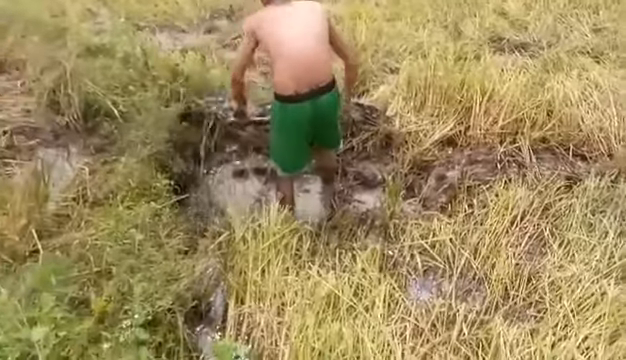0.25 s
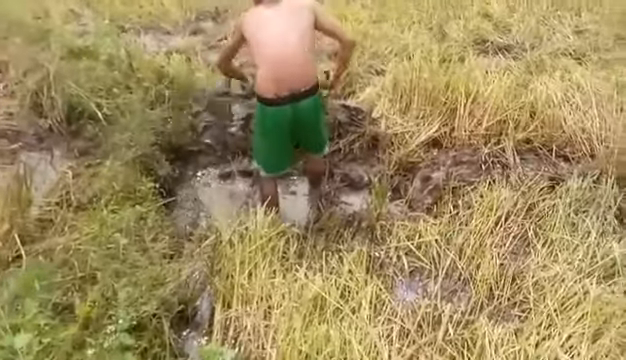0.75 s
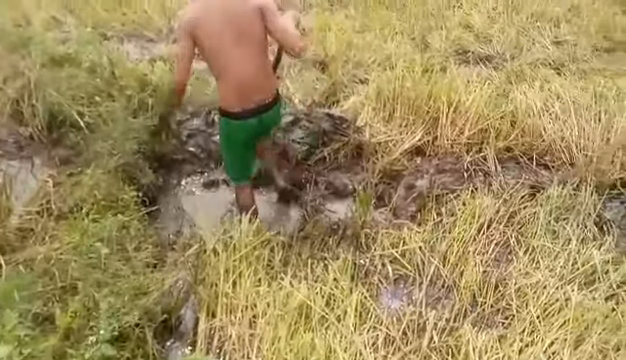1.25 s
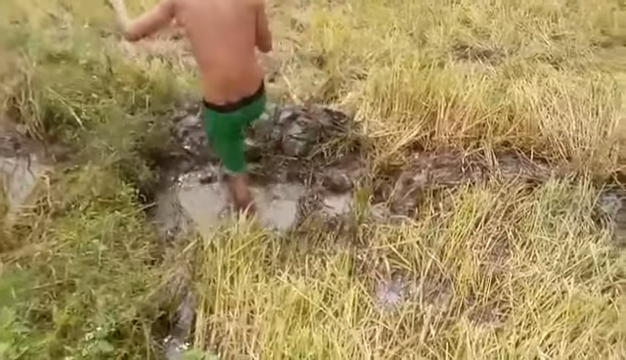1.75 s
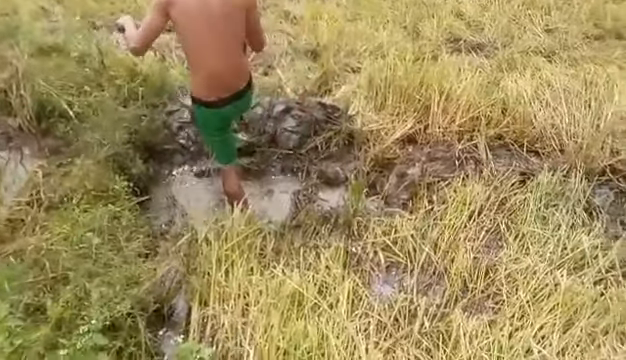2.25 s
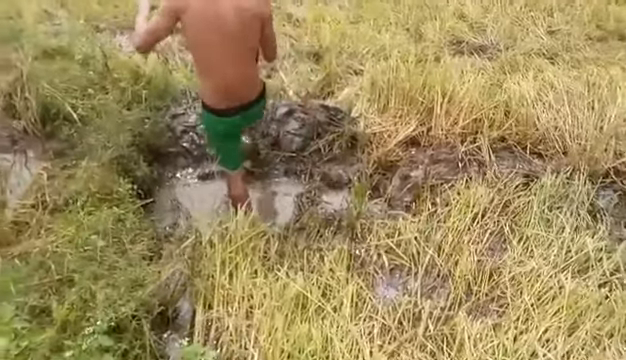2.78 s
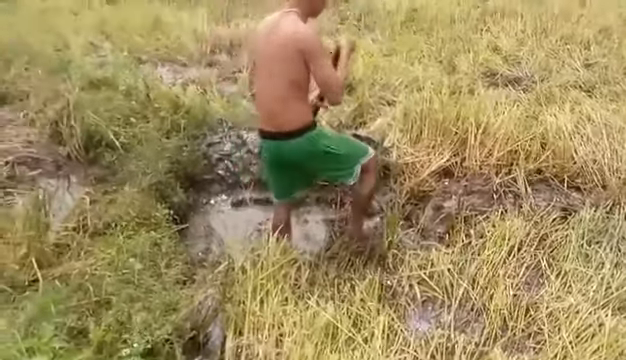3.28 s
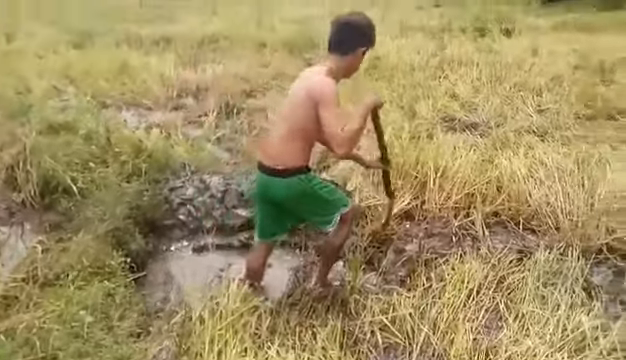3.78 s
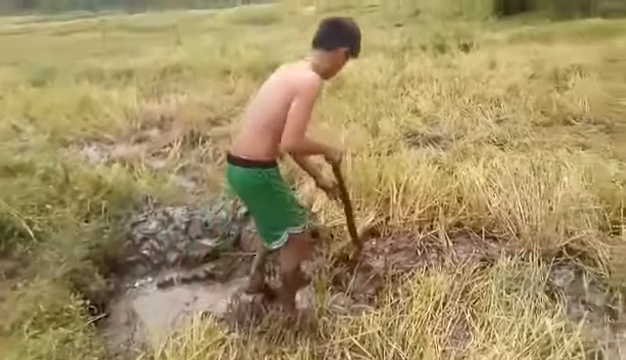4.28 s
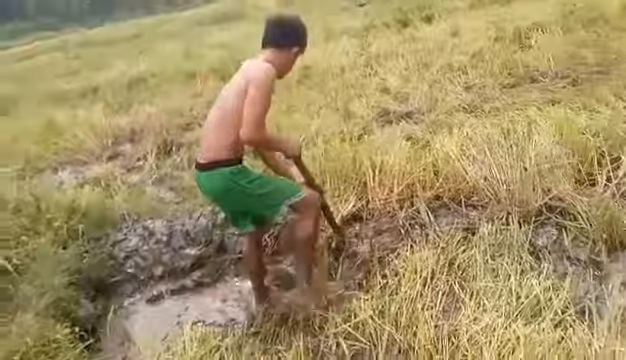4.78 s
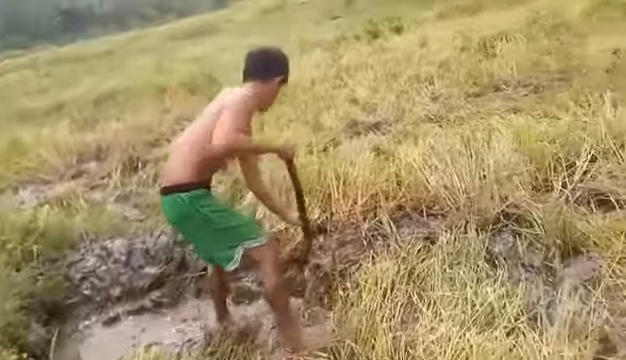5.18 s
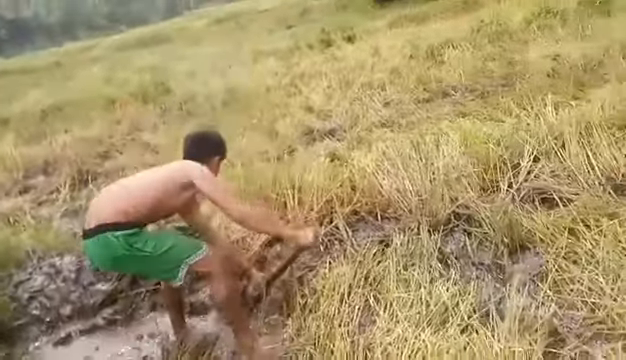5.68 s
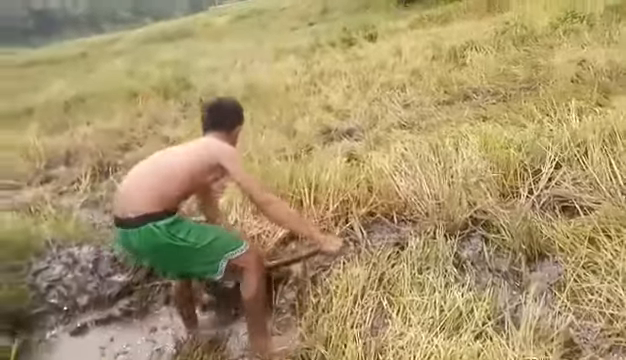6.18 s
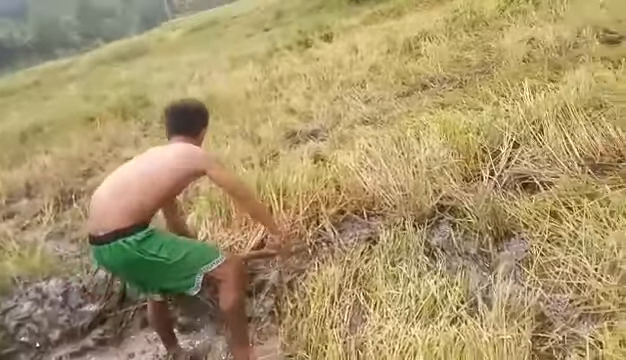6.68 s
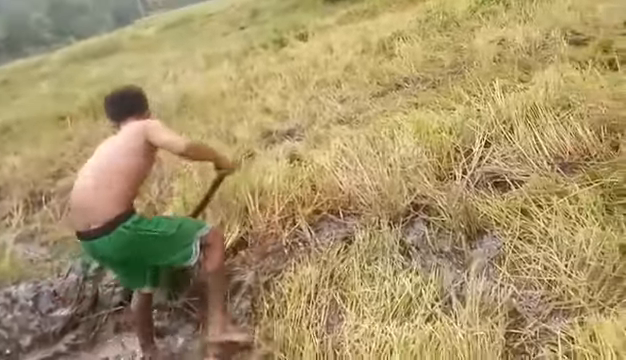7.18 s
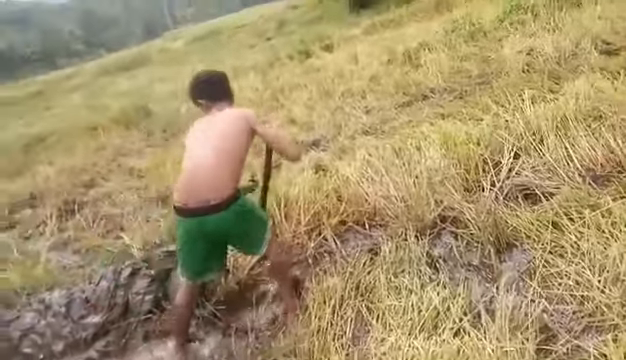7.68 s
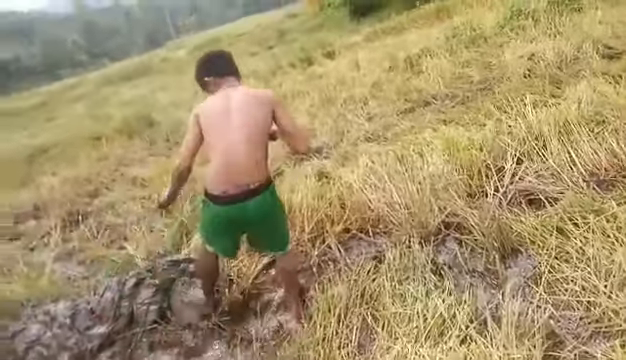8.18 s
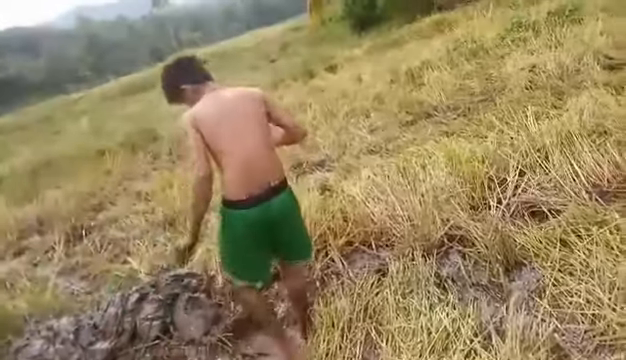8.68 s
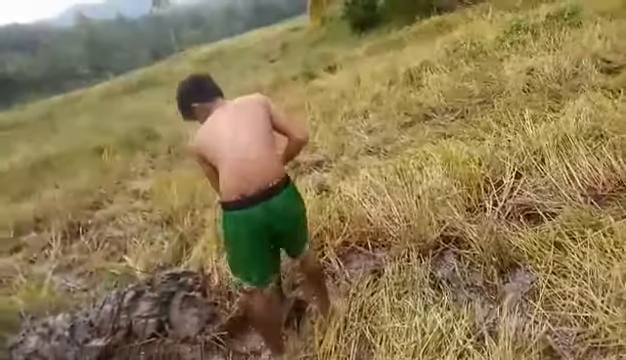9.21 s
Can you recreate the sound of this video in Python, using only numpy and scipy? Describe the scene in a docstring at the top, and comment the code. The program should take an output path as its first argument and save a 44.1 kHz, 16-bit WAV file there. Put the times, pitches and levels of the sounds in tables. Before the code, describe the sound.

Close wet plops, mud gulps and sloshing steps in a boggy field, faint far bird calls early on and light breeze on the microphone.

```python
"""Feet and a stick splash and squelch close by in shallow muddy water in an open field: bursts of small bubbles
over rushing noise. Single bubbles plop with a crack and a ring; mud gulps low, the deepest like thuds.
Far birds whistle, coo and twitter as gliding tones, blurred by a decaying echo; a far engine is one soft low tone.
The hush of grass and insects is patchy filtered noise, and a light breeze buffets the microphone in low gusts."""
import sys
import numpy as np
from scipy import signal
from scipy.fft import rfft, irfft, next_fast_len
from scipy.io import wavfile
from scipy.ndimage import uniform_filter1d, map_coordinates

SR = 44100
rng = np.random.default_rng(int(sys.argv[2]) if len(sys.argv) > 2 else 0)


def materialize(psi):
    """Save the field psi as 16-bit PCM at rate SR to the path in sys.argv[1].

    A 1-D psi becomes a single channel; in a 2-D psi each row is a channel.
    """
    bounded = np.clip(np.atleast_2d(psi).T, -1, 1)
    quanta = np.round(bounded * 32767).astype(np.int16)
    wavfile.write(sys.argv[1], SR, quanta)


N = 416744  # length in samples


def amp(db):
    """Gain of a level in dB."""
    return 10 ** (np.asarray(db) / 20)


def unit(x):
    """x at rms 1."""
    return x / np.sqrt(np.mean(x ** 2) + 1e-20)


def wobble(rate):
    """A smooth random curve, rate knots a second."""
    knots = rng.standard_normal(int(N * rate / SR) + 4)
    return map_coordinates(knots, [np.arange(N) * rate / SR])


def filter_length():
    """A fast transform length with room for the filter's tail."""
    return next_fast_len(N + 8192)


def coloured(x, spectrum):
    """x filtered by gain points (Hz, dB), joined on a log frequency axis."""
    m = filter_length()
    hz, db = np.transpose(spectrum)
    bins = np.fft.rfftfreq(m, 1 / SR)
    gain = amp(np.interp(np.log(bins + 1), np.log(hz + 1), db))
    return irfft(rfft(x, m) * gain, m)[:N]


def swells(starts, lengths, levels_db, rise, fall):
    """Bursts, summed in power, that rise over a share of their length, hold and die away in fall seconds."""
    power = np.zeros(N + 2 * SR)
    for start, length, db in zip(starts, lengths, levels_db):
        t = np.arange(round((length + 5 * fall) * SR)) / SR
        onset = 1 - np.exp(-(t / (rise * length)) ** 2)
        decay = np.exp(-np.maximum(t - length + fall / 2, 0) / fall)
        power[round(start * SR):][:len(t)] += (amp(db) * onset * decay) ** 2
    return np.sqrt(power[:N])


def patchy(depth_db):
    """Noise whose gain varies in patches of time and frequency."""
    z = signal.stft(rng.standard_normal(N), nperseg=512)[2]
    patches = uniform_filter1d(rng.standard_normal(z.shape), size=6, axis=0)
    patches = uniform_filter1d(patches, size=12, axis=1)
    return unit(signal.istft(z * amp(depth_db * unit(patches)), nperseg=512)[1][:N])


# Tone of the open field all round. Each row: frequency in Hz, relative level in dB.
HUSH_SPECTRUM = [(170, -17), (780, -19), (900, -3), (1150, 1.5), (1500, -8), (2000, -2.5), (3600, -7.5),
                 (4500, -17), (5600, -30), (8200, -43), (9600, -28), (13000, -97.5)]


def field_hush():
    """The hush of grass and insects: patchy noise with a broad middle and a small rise near 9.6 kHz."""
    hush_db = -48  # rms
    return amp(hush_db) * unit(coloured(patchy(depth_db=3.0), HUSH_SPECTRUM))


# Gusts of breeze right at the microphone. Each row: start in seconds, length in seconds, level in dB.
GUSTS = [(0.19, 0.613, -52.5), (0.987, 0.25, -57), (1.831, 0.3, -54.5), (2.913, 0.32, -55),
         (4.044, 0.31, -64.5), (4.458, 0.31, -59), (5.17, 0.38, -59.5), (5.713, 0.11, -49.5),
         (5.965, 0.56, -58.5), (6.801, 0.2, -55), (8.138, 0.35, -54.5)]
# Tone of the buffeting. Each row: frequency in Hz, relative level in dB.
BUFFET_SPECTRUM = [(20, -33), (64, -8), (128, 7), (221, -9.5), (300, -54)]
# Later gusts rumble deeper. Each row: gust start in seconds, deep rumble relative to the gust in dB.
DEEP_RUMBLE = [(6, -14), (8.2, 2)]


def breeze():
    """Turbulent air on the microphone: a faint steady buffet, low noise in gusts and a slower deep rumble."""
    start, length, db = np.transpose(GUSTS)
    buffet = coloured(rng.standard_normal(N), BUFFET_SPECTRUM)
    buffet = unit(buffet * amp(1.2 * wobble(12)))
    deep = unit(coloured(rng.standard_normal(N), [(15, -9), (55, 19.0), (90, 26), (140, -63.0)]))
    deep_db = db + np.interp(start, *np.transpose(DEEP_RUMBLE))
    gusts = swells(start, length, db, rise=0.025, fall=0.018)
    rumble = swells(start, length, deep_db, rise=0.47, fall=0.17)
    return (amp(-68.5) + gusts) * buffet + rumble * deep


# A far engine, heard in two sinking stretches. Each row: start in seconds, length in seconds,
# start pitch in Hz, end pitch in Hz, peak level in dB before it wavers.
DRONES = [(0.6, 1.4, 98, 91.2, -67), (1.698, 2.4, 124, 109, -65)]


def drone():
    """A far engine heard as one soft low tone that swells, wavers and sinks."""
    out, waver = np.zeros(N), amp(1.8 * wobble(6))
    for start, length, start_hz, end_hz, db in DRONES:
        u = np.arange(round(length * SR)) / (length * SR)
        hz = start_hz + (end_hz - start_hz) * u
        tone = np.sin(2 * np.pi * np.cumsum(hz) / SR)
        out[round(start * SR):][:len(u)] += amp(db) * np.sin(np.pi * u) ** .5 * tone
    return out * waver


def twitter():
    """Small birds farther off: rows of falling chirps, laid out like the bird notes, the longer the softer."""
    last_s, low_hz, high_hz, loudest_db = 2.4, 6300, 8300, -67
    rows = []
    for when, pitch, size in rng.random((45, 3)):
        hz = low_hz + (high_hz - low_hz) * pitch
        rows.append((when * last_s, .02 + .06 * size, hz, hz * (1 - .07 * size), 0, loudest_db - 8 * size))
    return rows


# Short notes and coos of far birds. Each row: start in seconds, length in seconds, start pitch in Hz,
# end pitch in Hz, mid-note arch in Hz, peak level in dB before flutter and echo.
BIRD_NOTES = [(.2, .1, 615, 615, 0, -59), (.33, .09, 605, 600, 0, -60), (.525, .045, 6100, 5300, 150, -56),
              (.68, .035, 5450, 5000, 50, -55), (.832, .032, 5600, 4300, -100, -49),
              (.92, .02, 3920, 3840, 50, -46), (.978, .045, 4150, 3600, 80, -44),
              (1.124, .029, 4000, 4050, 280, -41), (1.162, .075, 3700, 3850, 270, -43),
              (1.799, .075, 4240, 4000, 0, -44), (1.875, .17, 4660, 4580, -20, -57),
              (2.154, .059, 3384, 3480, 135, -43), (6.95, .19, 7380, 7310, -30, -68),
              (8.985, .035, 4650, 5200, 0, -54)]


def bird_notes(unsteady):
    """Each note or chirp is a pure tone that glides and arches in pitch under a rounded swell."""
    out = np.zeros(N + SR)
    for start, length, start_hz, end_hz, arch_hz, db in BIRD_NOTES + twitter():
        u = np.arange(round(length * SR)) / (length * SR)
        hz = start_hz + (end_hz - start_hz) * u + 4 * arch_hz * u * (1 - u)
        hz *= unsteady[round(start * SR):][:len(u)] ** 2
        tone = np.sin(2 * np.pi * np.cumsum(hz) / SR)
        out[round(start * SR):][:len(u)] += amp(db) * np.sin(np.pi * u) ** .5 * tone
    return out[:N]


# Repeats of a far rising whistle. Each row: start in seconds, peak level in dB before flutter and echo.
WHISTLES = [(2.464, -36), (2.762, -37), (3.06, -37.5)]
# Course of that whistle. Each row: seconds after its start, pitch in Hz, level relative to its peak in dB.
WHISTLE_COURSE = [(0, 3500, -14), (.044, 3900, -14), (.056, 4150, 0), (.087, 4430, -3), (.115, 4850, -15),
                  (.175, 5600, -29), (.23, 7200, -28)]


def rising_whistles(unsteady):
    """One pure tone climbs in pitch, loudest early on, and is repeated."""
    out = np.zeros(N + SR)
    after, hz, level_db = np.transpose(WHISTLE_COURSE)
    t = np.arange(round(after[-1] * SR)) / SR
    for start, db in WHISTLES:
        pitch = np.interp(t, after, hz) * unsteady[round(start * SR):][:len(t)]
        level = amp(db + np.interp(t, after, level_db))
        out[round(start * SR):][:len(t)] += level * np.sin(2 * np.pi * np.cumsum(pitch) / SR)
    return out[:N]


def birds():
    """Far birds: the air makes them flutter, and echoes from the field's edge blur them as decaying noise."""
    unsteady = 1 + .008 * wobble(200)  # pitch factor
    direct = bird_notes(unsteady) + rising_whistles(unsteady)
    direct = direct * amp(3 * wobble(80))
    t = np.arange(SR // 3) / SR
    echo = rng.standard_normal(len(t)) * amp(-60 * t / 0.36)  # falls 60 dB in 0.36 s
    echo_db = -7
    return direct + amp(echo_db) * signal.fftconvolve(direct, echo / np.linalg.norm(echo))[:N]


# Air pockets closing in the mud close by. Each row: start in seconds, level in dB before the filter,
# starting pitch in Hz.
GULPS = [(0.583, -11, 339), (0.591, -8.5, 116), (2.968, -22.5, 131), (4.506, -28.5, 575),
         (5.737, -21.5, 453), (6.113, -25, 291), (6.537, -21, 475), (6.688, -32.5, 555),
         (6.815, -25.5, 320), (6.84, -17.5, 170), (6.835, -16, 472), (7.943, -23, 583)]


def gulps():
    """An air pocket closing in the mud rings low and short, rising slightly in pitch."""
    out, t = np.zeros(N + SR), np.arange(SR // 5) / SR
    for start, db, hz in GULPS:
        ring = np.sin(2 * np.pi * hz * t * (1 + 0.27 * t))
        decay = amp(db - 60 * t / 0.045)  # 60 dB in 45 ms
        out[round(start * SR):][:len(t)] += decay * (1 - np.exp(-t / 0.0016)) * ring
    return coloured(out[:N], [(30, -20.5), (110, -4), (13000, 6.5)])


# Single bubbles and drops that stand out close by. Each row: start in seconds, ring level in dB before
# its envelope and the filter, starting pitch in Hz, crack relative to the ring in dB.
PLOPS = [(0.02, -25.5, 1070, -19), (0.17, -16, 1080, 1.5), (0.211, -14.5, 1586, -1.5),
         (0.584, -11.5, 1050, -3.5), (1.181, -20.5, 3250, 0.5), (1.395, -19.5, 1050, -11),
         (1.424, -18, 950, -20), (1.44, -3.5, 1084, -33), (1.462, -20.5, 3360, -8),
         (1.475, -22.5, 1480, -1), (1.555, -25.5, 1450, 4.5), (1.738, -28, 1420, 3.5),
         (2.105, -24.5, 2300, -4), (2.365, -26.5, 2420, 3.5), (3.19, -17, 3310, 8.5), (3.202, -20, 1600, 1),
         (3.337, -16, 1200, -11), (3.343, -14, 1760, -12), (3.352, -19, 3130, -1.5),
         (3.394, -25.5, 1120, -17), (4.01, -14.5, 3230, -18), (4.276, -19, 980, -13),
         (4.302, -16.5, 1024, -22), (4.318, -17.5, 1030, -22), (4.442, -17.5, 4320, -2),
         (4.489, -16, 3345, 1), (4.514, -14.5, 1710, -1.5), (4.676, -15.5, 1586, -9),
         (4.7, -14.5, 1170, -10), (4.704, -17, 3060, -13), (4.732, -17, 1210, -11), (4.79, -17, 1240, -8.5),
         (5.031, -23, 1840, -2), (5.672, -19, 2090, 0.5), (5.74, -19, 885, -3), (5.843, -24, 2280, -6),
         (5.914, -25, 1880, -9), (6.35, -21.5, 1830, -15), (6.449, -23, 990, -18), (6.575, -21, 980, 0.5),
         (6.632, -25.5, 1240, -20), (6.645, -20.5, 3770, -2), (6.847, -12.5, 1710, 1),
         (7.552, -24.5, 854, 8.5), (7.87, -21.5, 1670, -30), (7.931, -24, 1120, -21),
         (8.44, -27.5, 1140, -1), (8.806, -22.5, 2740, 2.5), (9.079, -9.5, 954, -38)]


def plops():
    """Each plop cracks as the surface breaks, then its bubble rings for some cycles, longer when it is large."""
    out, t = np.zeros(N + SR), np.arange(SR // 20) / SR
    for start, db, hz, crack_db in PLOPS:
        life = 0.0024 + 0.62 / hz  # s; lower pitch means a larger bubble
        envelope = t / life * np.exp(1 - t / life * 1.75)
        ring = envelope * np.sin(2 * np.pi * hz * t * (1 + 0.0093 * t / life))
        burst = (t / 0.0034) ** 2 * np.exp(1 - (t / 0.0027) ** 1.274)
        crack = amp(crack_db) * burst * rng.standard_normal(len(t))
        out[round(start * SR):][:len(t)] += amp(db) * (ring + crack)
    return coloured(out[:N], [(300, -61.0), (800, 0.0), (4500, -1.0), (7000, -22.0), (13000, -52.5)])


def bubbles(count, low_hz, high_hz, cycles, scatter_db, size):
    """Many short bubbles, each size samples long: each swells, rises in pitch and dies after a few cycles."""
    when, pitch, life, strength = rng.random((count, 4)).T[:, :, None]
    hz = low_hz * (high_hz / low_hz) ** pitch
    own_cycles = cycles * (.5 + life)
    age = np.arange(size) / SR * hz / own_cycles  # in lifetimes
    ring = age * np.exp(-2.5 * age) * np.sin(2 * np.pi * own_cycles * age * (1 + 0.031 * age))
    ring *= hz * amp(-scatter_db * np.log(1 - .98 * strength))  # hz keeps the spectrum about flat
    index = (when * N).astype(int) + np.arange(size)
    return unit(np.bincount(index.ravel(), ring.ravel(), N + size)[:N])


# Splashes of a foot or the stick, close by. Each row: start in seconds, length in seconds,
# slosh level in dB, spray relative to slosh in dB.
SPLASHES = [(0.133, 0.12, -42, -0.5), (0.566, 0.058, -27, -3), (1.16, 0.045, -43, -4),
            (1.371, 0.14, -31.5, -9.5), (1.474, 0.14, -41.5, -1), (1.633, 0.12, -48.5, 6.5),
            (2.25, 0.15, -50, 0), (3.173, 0.095, -41.5, 2), (3.366, 0.091, -44, -5),
            (3.986, 0.058, -40, 0.5), (4.252, 0.091, -33.5, -24), (4.439, 0.11, -34.5, -5),
            (4.649, 0.11, -31.5, -15.5), (4.737, 0.077, -35, -19), (4.983, 0.087, -38, -2),
            (5.66, 0.072, -29, -2), (6.053, 0.09, -41.5, -24), (6.356, 0.14, -42.5, -1),
            (6.799, 0.06, -24.5, -8.5), (7.244, 0.15, -42, -7.5), (7.536, 0.073, -36, -4.5),
            (7.603, 0.039, -33, -10.5), (7.757, 0.064, -35.5, -4), (7.852, 0.059, -35, -40),
            (7.926, 0.038, -35, -13.5), (8.134, 0.11, -44, -2.5), (8.775, 0.052, -41.5, 2),
            (9.061, 0.045, -35.5, -8.5), (9.212, 0.15, -37, -2)]
# Legs and stick stirring the water between splashes. Each row: time in seconds, slosh level in dB
# before it wavers, spray relative to slosh in dB.
STIRRING = [(0, -56, 3.5), (0.2, -67, 6.5), (4.1, -75, 5), (4.23, -45, -3), (4.58, -46.5, -5.5),
            (4.92, -46.5, -1), (5.2, -46, -8), (5.6, -63.5, 5), (5.82, -39.5, -9.5), (6.0, -59, 2.5),
            (6.27, -42, -6), (6.57, -44.5, -2), (6.75, -50.5, -6), (7.1, -56.5, -2.5), (7.72, -46.5, -1.5),
            (8.04, -44, -9), (8.35, -61, -7), (9.2, -58.5, 1.5), (9.45, -41, -2.5)]
# How thick the mud is where the water moves. Each row: time in seconds, sucking relative to slosh in dB.
MUD = [(0.1, -21), (0.6, -10), (1.5, -28), (4.3, -34), (4.55, -20.5), (4.8, -37), (5.3, -13), (5.75, -11.5),
       (5.95, -17), (6.1, -3.5), (6.5, -6.5), (6.61, -17), (6.72, -5), (6.95, -11.5), (7.25, -25),
       (7.8, -19), (9.4, -16)]
# Tones of the middling, small and large bubbles. Each row: frequency in Hz, relative level in dB.
SLOSH_SPECTRUM = [(400, -33), (760, -13), (1080, -3.5), (1370, -5.5), (2000, -6), (2800, -14.5),
                  (3600, -71)]
SPRAY_SPECTRUM = [(2000, -25), (2600, -9.5), (3470, -1.5), (4500, -7.5), (5260, -15.5), (7080, -21),
                  (8800, -46.5), (13000, -42.5)]
SUCK_SPECTRUM = [(150, -14.5), (250, -4.5), (450, 3.5), (620, 5), (760, -45)]


def water():
    """Bubbles on a rush of noise: middling ones slosh and small ones spray in clumps, large ones suck."""
    start, length, db, spray_db = np.transpose(SPLASHES)
    now = np.arange(N) / SR
    when, stir_db, stir_spray_db = np.transpose(STIRRING)
    stir = amp(np.interp(now, when, stir_db) + 2.26 * wobble(13))
    stir_spray = stir * amp(np.interp(now, when, stir_spray_db))
    rush = 1.8 * rng.standard_normal((3, N))  # rms relative to the bubbles
    clumps = amp(1.7 * wobble(45))
    slosh = bubbles(5000, low_hz=612, high_hz=2705, cycles=5.3, scatter_db=2.0, size=400) + rush[0]
    spray = bubbles(9000, low_hz=2360, high_hz=9650, cycles=10.0, scatter_db=3.0, size=180) + rush[1]
    suck = bubbles(1600, low_hz=230.5, high_hz=844, cycles=6.2, scatter_db=2.0, size=1000) + rush[2]
    # Splashes and stirring add in power.
    flow = np.hypot(swells(start, length, db, rise=0.3, fall=0.029), stir)
    spray_flow = np.hypot(swells(start, length, db + spray_db, rise=0.16, fall=0.028), stir_spray)
    slosh = unit(coloured(slosh, SLOSH_SPECTRUM) * clumps) * flow
    spray = unit(coloured(spray, SPRAY_SPECTRUM) * clumps) * spray_flow
    thickness = amp(np.interp(now, *np.transpose(MUD)))
    return slosh + spray + unit(coloured(suck, SUCK_SPECTRUM)) * flow * thickness


# Filter of a flickering copy of the sound. Each row: frequency in Hz, gain in dB.
FLICKER_FILTER = [(3000, -81), (4000, -47), (5500, -8), (12500, -10)]


def scene():
    """One microphone hears it all; a filtered, flickering copy is added on the left, subtracted on the right."""
    heard = field_hush() + breeze() + drone() + birds() + gulps() + plops() + water()
    flicker = coloured(heard * wobble(150), FLICKER_FILTER)
    return np.array([heard + flicker, heard - flicker])


# The microphone's colour. Each row: frequency in Hz, gain in dB.
MIC_COLOUR = [(2700, -0.5), (3400, 0), (4050, -1.5), (4600, -1.5), (5300, 0)]


def record(dry):
    """The microphone slightly colours the low treble; nothing is kept above a sharp band limit."""
    top_hz = 13100
    m = filter_length()
    heard = rfft([coloured(x, MIC_COLOUR) for x in dry], m)
    kept = np.fft.rfftfreq(m, 1 / SR) < top_hz
    return irfft(heard * kept, m)[:, :N]


dry = scene()
out = record(dry)
materialize(out)
```